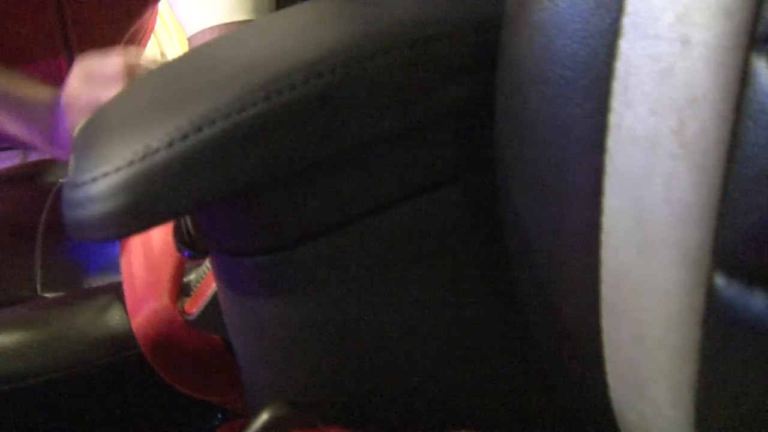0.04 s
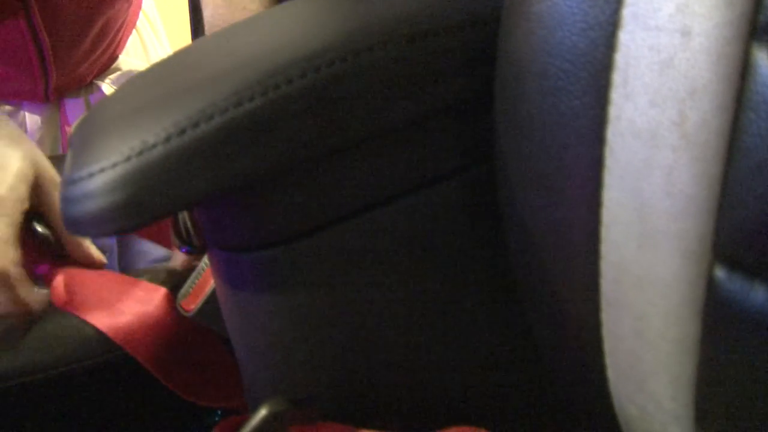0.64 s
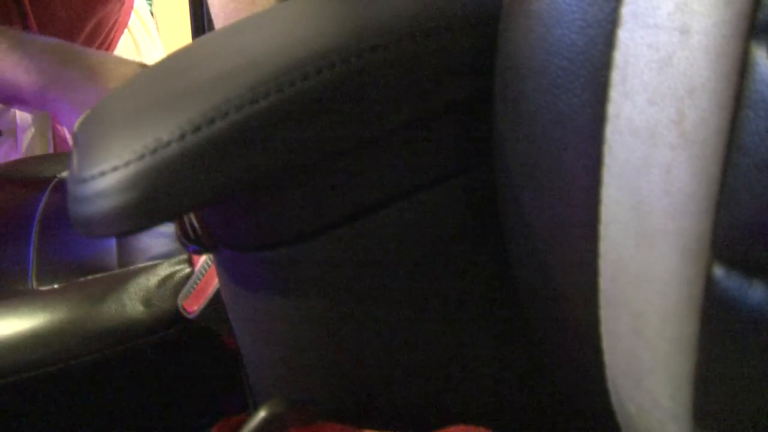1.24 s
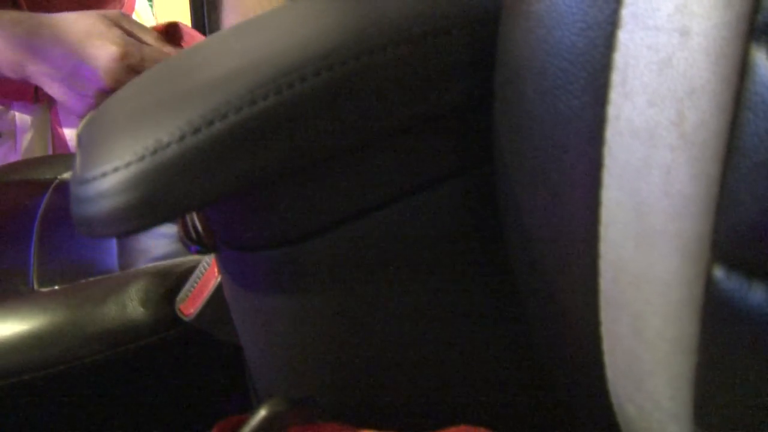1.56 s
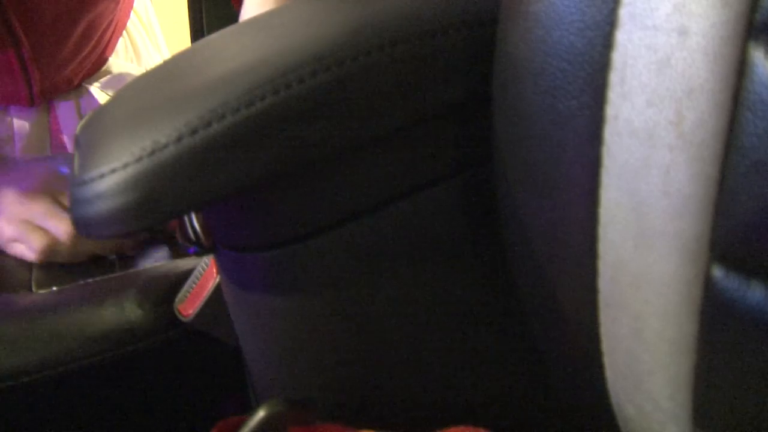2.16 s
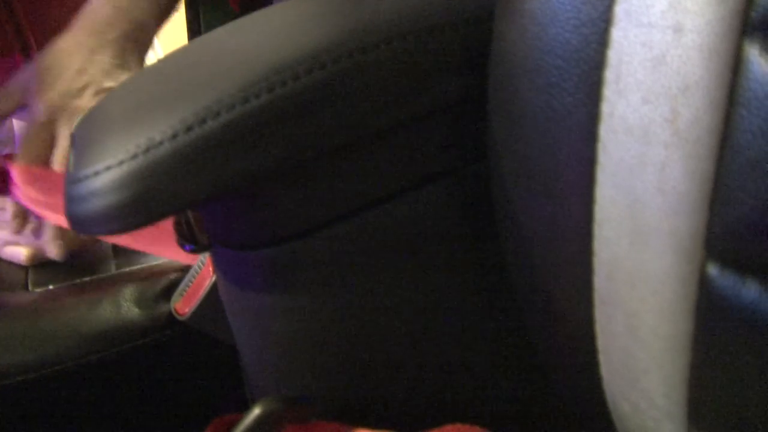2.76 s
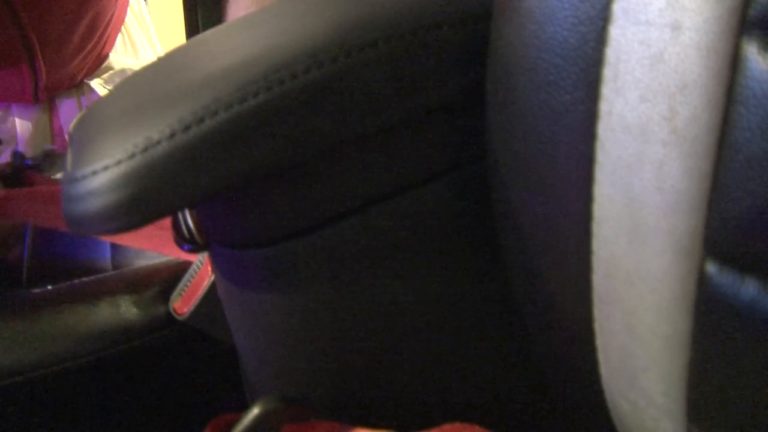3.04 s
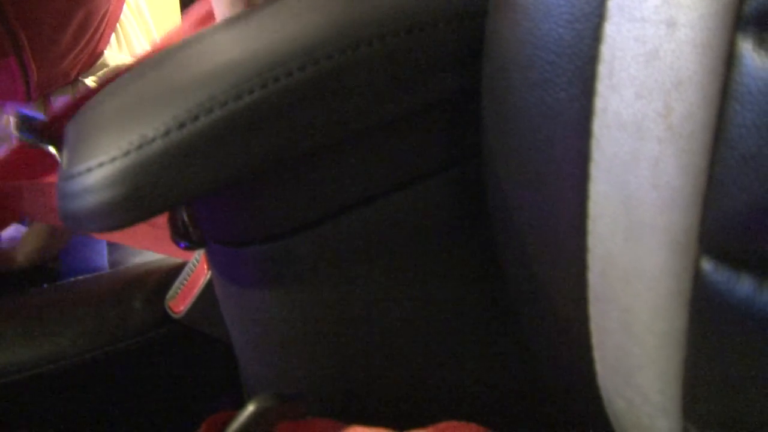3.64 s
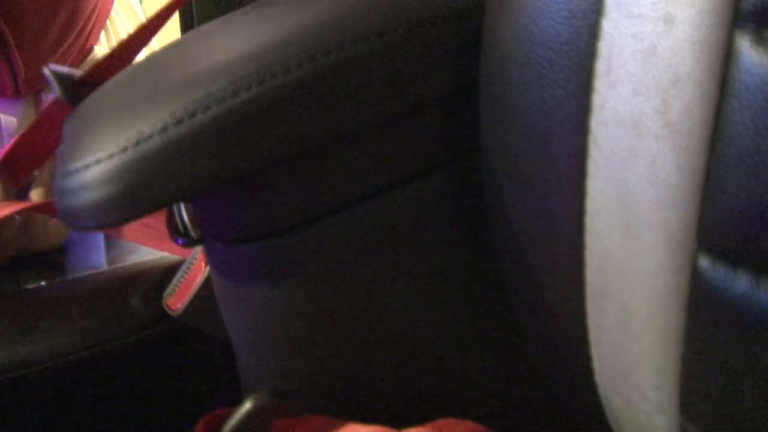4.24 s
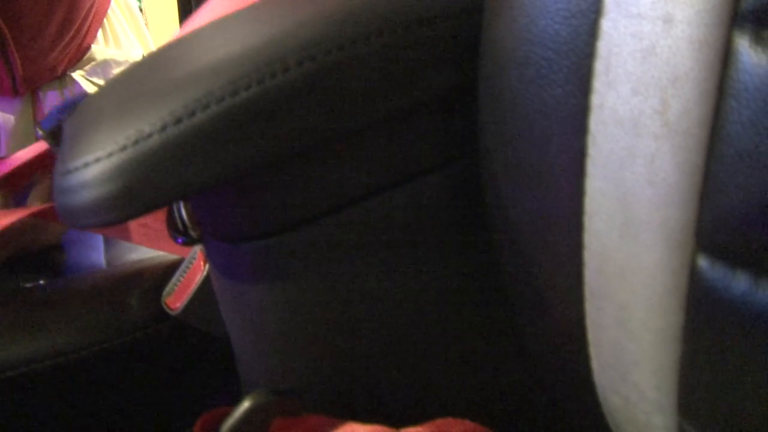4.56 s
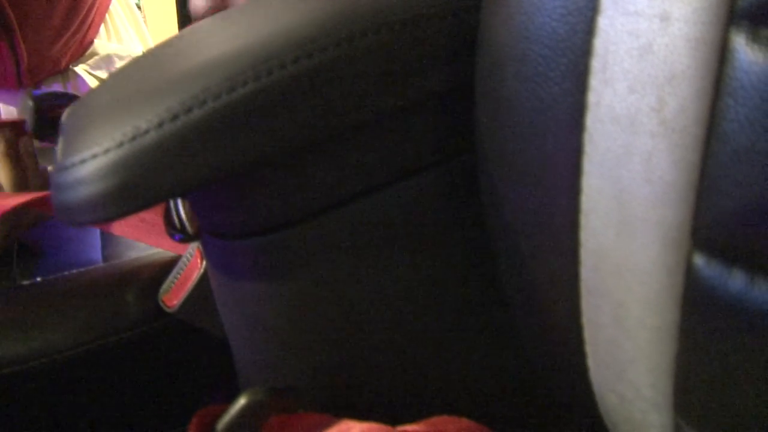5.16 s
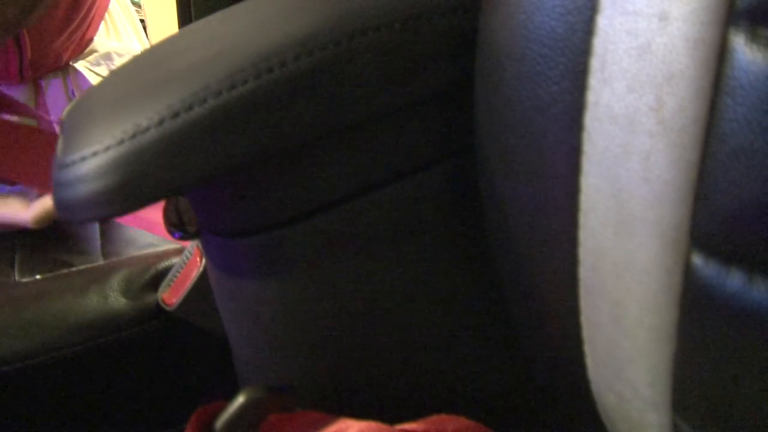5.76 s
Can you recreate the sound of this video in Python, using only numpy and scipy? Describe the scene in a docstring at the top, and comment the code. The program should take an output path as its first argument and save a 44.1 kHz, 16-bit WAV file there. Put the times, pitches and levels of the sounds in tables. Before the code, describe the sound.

A seat belt is handled close by inside a parked car, over a very faint low cabin hush. In the first half second a quick stutter of dull bumps makes the padded seat boom, with softer bumps until about 1.3 seconds. Throughout, the webbing slides over cloth and upholstery in short, uneven pulls, giving a soft rub, a hiss and a little low rumble. The metal latch and plastic buckle click and knock irregularly against hollow trim, with small scrapes and a few faint clinks. A sharp click stands out near 1.1 seconds, and plastic creaks briefly at 2 seconds. At about 3.3 seconds the latch goes home with a clack and the catch snaps shut. A knock follows at 3.7, then more strap sliding with faint zipping, a cluster of clicks near 4.8 and a scrape and click around 5.4, before the rustling fades by 6 seconds.

```python
"""Between the front seats of a parked car, a seat belt is handled.
A stutter of dull bumps sets the seat booming, then the webbing slides over cloth and upholstery in
uneven pulls, its fibres catching in a rub and a hiss. The latch tongue and buckle tick, scrape, creak
and clink against the hollow trim; midway the latch goes home with a clack and the catch springs shut."""
import sys
import numpy as np
from scipy import signal
from scipy.fft import rfft, irfft
from scipy.io import wavfile
from scipy.ndimage import uniform_filter1d

SR = 44100
rng = np.random.default_rng(int(sys.argv[2]) if len(sys.argv) > 2 else 0)


def generate_wav(sig):
    """Save sig (samples, or channels by samples) to the path in sys.argv[1] as 16-bit PCM at SR."""
    pcm = np.round(np.clip(np.atleast_2d(sig).T, -1, 1) * 32767).astype(np.int16)
    wavfile.write(sys.argv[1], SR, pcm)


N = 264864
TIME = np.arange(N) / SR

# modes of the hollow console trim: pitch_hz, level_db, t60_s
TRIM_MODES = [(106.5, -5, 0.11), (147, 1.5, 0.039), (203.6, -3.5, 0.084), (236, -8.5, 0.067),
              (294, -2, 0.042), (387, -10, 0.067), (467, -5.5, 0.031)]
# modes of the plastic buckle housing: pitch_hz, level_db, t60_s
HOUSING_MODES = [(444.4, -25, 0.0082), (790, -8.5, 0.0074), (972, -10.5, 0.014), (1530, -5, 0.0048),
                 (1760, -7, 0.005), (3060, -12, 0.0019), (3700, -38, 0.012)]
# colour of bright sliding friction: frequency_hz, level_db
HISS_SPECTRUM = [(1300, -16.5), (2100, -2), (2700, 3.5), (3400, 0.5), (4400, 0.5), (6200, -3.5),
                 (7200, -12), (9000, -5.5), (11500, -14), (13300, -18.5), (14300, -20.5), (15000, -46)]
# pulls of the strap: start_s, length_s, hiss_db, swell_db, then over the hiss: rub_db, rumble_db, sheen_db
STRAP_PULLS = [(0.207, .215, -67, -2.5, 3, 9.5, -3), (0.476, 0.016, -66.5, -8.5, 8.5, 17.5, 2),
               (0.568, 0.036, -64.5, -18, -1.5, 18.5, 0), (0.621, 0.028, -58, 0.5, 2.5, 17.5, -8),
               (0.67, 0.135, -72, 11, 0, 6.5, -3), (0.803, .15, -61.5, -5.5, 0.5, 6, -2.5),
               (0.962, 0.17, -77.5, -5, 8, 22.5, -4), (1.086, 0.18, -61, -2.5, 1, 10.5, -5),
               (1.258, 0.062, -59.5, -5.5, 0.5, 13.5, -2), (1.396, 0.031, -59.5, -4.5, 1.5, 12.5, -12),
               (1.434, 0.11, -63, 2.5, -3, 7.5, -6.5), (1.689, 0.076, -70, -6.5, 5, -10, 3.5),
               (1.805, 0.059, -62.5, 18.5, -3.5, -1.5, -3), (2.079, 0.091, -64.5, -14, 4.5, 14, -4),
               (2.211, 0.075, -79, 6, 15, 20, 2), (2.295, 0.23, -65, 4.5, 0.5, 6, 0.5),
               (2.543, 0.15, -68, -0.5, 6, 14.5, -0.5), (2.789, 0.1, -70.5, 5, 10, 12.5, -0.5),
               (2.895, 0.12, -61.5, -9, 3, 2, -3), (3.025, 0.12, -68, -6, 7, 4.5, 1),
               (3.18, 0.24, -66.5, -6, 3, 9, -0.5), (3.297, 0.051, -64, -1, 2, 14, 5),
               (3.52, 0.11, -68, 9, 3.5, 10, -0.5), (3.627, 0.21, -60.5, -2, 3, 6.5, 2.5),
               (4.064, 0.18, -64.5, -2, 1, 7, 2), (4.362, 0.041, -67, 10, -8, -1, 1),
               (4.518, 0.14, -64, 0, 0, 9, 2.5), (4.714, 0.081, -76, -16, 11.5, 20, -1),
               (4.753, 0.051, -69.5, 2, -1, -14, 2.5), (4.813, 0.27, -66, -2.5, 1, 2.5, 0),
               (5.053, 0.24, -72, 12, -26, -21, 8), (5.302, 0.09, -62.5, 1, 1.5, 6, 3.5),
               (5.371, 0.06, -53, -0.5, 3, 1, -2.5), (5.454, .014, -54.5, -0.5, 3.5, 0.5, 1.5),
               (5.702, .15, -73.5, -2, 3.5, 1.5, 4)]


def from_db(db):
    """Decibels to gain."""
    return 10 ** (np.asarray(db) / 20)


def rms_one(x):
    """Scale to unit rms."""
    return x / np.sqrt(np.mean(x ** 2) + 1e-20)


def add(track, start_s, sound):
    """Mix a sound into a track at a time."""
    at = max(round(start_s * SR), 0)
    track[at:at + len(sound)] += sound[:max(N - at, 0)]


def cut(x, hz, kind, order=2):
    """Causal low- or high-pass."""
    return signal.sosfilt(signal.butter(order, min(hz, SR / 2 - 1), kind, fs=SR, output="sos"), x + 1e-18)


def colour(x, spectrum):
    """Give a noise a spectrum; unit rms."""
    hz, db = np.transpose(spectrum)
    bins_hz = np.maximum(np.fft.rfftfreq(len(x), 1 / SR), 1)
    curve_db = np.interp(np.log(bins_hz), np.log(hz), db, left=-80, right=-80)
    return rms_one(irfft(rfft(x) * from_db(curve_db), len(x)))


def drift(per_s):
    """A random wander, gliding from one value to the next."""
    knots = rng.standard_normal(N // 20)
    return np.interp(TIME * per_s, np.arange(len(knots)), knots)


def ring(force, modes):
    """Damped modes in parallel, neighbours swinging in opposite senses."""
    out = 0
    for k, (hz, db, t60_s) in enumerate(modes):
        decay, angle = from_db(-60 / (t60_s * SR)), 2 * np.pi * hz / SR
        mode = signal.lfilter([0, np.sin(angle)], [1, -2 * decay * np.cos(angle), decay ** 2], force + 1e-18)
        out = out - (-1) ** k * from_db(db) * mode
    return out


def contact(hardness_hz, size=2048):
    """The force pulse of one touch: the softer, the longer."""
    return cut(signal.unit_impulse(size), hardness_hz, "low")


def scatter(tail_db, t60_s, size=4096):
    """A direct pulse and the dense, quickly dying reflections of the cabin."""
    tail = rng.standard_normal(size) * from_db(-60 * np.arange(size) / SR / t60_s)
    return signal.unit_impulse(size) + from_db(tail_db) * tail / np.linalg.norm(tail)


def grains(per_s, spread_db):
    """Fibres catching and letting go at random, a few harder than the rest."""
    sizes = from_db(spread_db * np.minimum(rng.exponential(1, N), 4)) * rng.choice([-1, 1], N)
    return rms_one(sizes * (rng.random(N) < per_s / SR))


def shifting(x, patchy_db, size=1024, blur=4):
    """As the contact patch moves, narrow resonances come and go at random; unit rms."""
    frames = signal.stft(x, nperseg=size)[2]
    patches = uniform_filter1d(rng.standard_normal(frames.shape), blur, axis=0)
    patches = rms_one(uniform_filter1d(patches, blur, axis=1))
    return rms_one(signal.istft(frames * from_db(patchy_db * patches), nperseg=size)[1][:N])


def cabin_tone(level_db):
    """The low, steady hush of the still cabin."""
    # colour of the cabin air: frequency_hz, level_db
    air_spectrum = [(20, -10), (60, 13), (150, -4.5), (400, -20), (1500, -12), (6000, -43.5), (15000, -45)]
    return from_db(level_db) * colour(rng.standard_normal(N), air_spectrum)


def seat_bumps(lowest_hz, slap_db):
    """Bumps set the seat booming, each with a faint dull slap on its cover."""
    # blows on the padded seat: start_s, level_db, hardness_hz
    blows = [(0.0159, -13.5, 456), (0.0522, -9, 416), (0.086, -7, 364), (.105, -8.5, 414),
             (0.1261, -8, 436), (0.166, -5, 417), (0.4156, -5, 440), (0.6442, -23.5, 452),
             (0.8181, -21.5, 240), (0.963, -31, 350), (1.0741, -19, 210), (1.0917, -16.5, 218),
             (1.106, -23, 400), (1.1766, -26, 150), (1.327, -26.5, 250), (3.513, -33, 110),
             (3.863, -32.5, 160), (5.414, -28.5, 150)]
    # modes of the seat: pitch_hz, level_db, t60_s
    seat_modes = [(65.4, -16.5, 0.15), (174, -11, 0.036), (230, -39, 0.027), (262.7, -17.5, 0.039),
                  (430, -55, 0.0066), (605, -21.5, 0.014), (727, -26.5, 0.025), (1077, -27.5, 0.043),
                  (1383, -26, 0.032)]
    force, slap = np.zeros(N), np.zeros(N)
    for start_s, db, hardness_hz in blows:
        add(force, start_s, from_db(db) * contact(hardness_hz))
        add(slap, start_s, from_db(db) * cut(scatter(tail_db=5.5, t60_s=0.048), hardness_hz, "low"))
    boom = cut(ring(force, seat_modes), lowest_hz, "high")
    return boom + from_db(slap_db) * cut(slap, 426, "high")


def tongue_clinks():
    """The steel tongue rings briefly, damped by its plastic grip."""
    # taps on the tongue: start_s, level_db
    taps = [(0.5746, -52.5), (0.8289, -55.5), (2.823, -61.5), (3.304, -49.5)]
    # modes of the steel: pitch_hz, level_db, t60_s
    steel_modes = [(2940, -18, 0.017), (3150, -17, 0.024), (4070, -11, 0.034), (4470, -12, 0.014),
                   (5060, -3, 0.014), (5880, -11, 0.049), (6550, -7.5, 0.0033)]
    force = np.zeros(N)
    for start_s, db in taps:
        add(force, start_s, from_db(db) * scatter(tail_db=12, t60_s=0.0086))
    return ring(force, steel_modes)


def latch_scrapes(fade_s):
    """A dense run of tiny catches drives the housing while the latch drags."""
    # drags over plastic: start_s, length_s, level_db, grit_db (over the hollow tone)
    drags = [(0.62, 0.032, -64.5, -5), (1.8, 0.059, -73, 4.5), (3.285, 0.023, -51, 3.5),
             (3.783, 0.023, -75, 16), (4.82, 0.012, -69, -11), (4.958, 0.033, -54.5, -2.5),
             (5.392, .06, -63.5, 6.5)]
    pressure = np.zeros((N, 2))
    for start_s, length_s, db, grit_db in drags:
        add(pressure, start_s, from_db([db, db + grit_db]) * np.ones((round(length_s * SR), 1)))
    decay = np.exp(-1 / (fade_s * SR))
    hollow, grit = signal.lfilter([1 - decay], [1, -decay], pressure.T + 1e-18)
    catches = grains(per_s=8400, spread_db=2)
    return hollow * rms_one(ring(catches, HOUSING_MODES)) + grit * colour(catches, HISS_SPECTRUM)


def plastic_creak(start_s, slips, slips_per_s, force_db, fade_db):
    """An even run of stick-slip jerks, each a little weaker, rings the plastic and the trim behind it."""
    # modes of the creaking plastic: pitch_hz, level_db, t60_s
    plastic_modes = [(930, -18, 0.0068), (1320, -17, 0.013), (1410, -20, 0.025)]
    force = np.zeros(N)
    for k in range(slips):
        slip = cut(scatter(tail_db=-1, t60_s=0.059), 1710, "low")
        add(force, start_s + k / slips_per_s, from_db(force_db - k * fade_db) * slip)
    crack = from_db(15) * cut(force, 503, "high")
    thud = from_db(-21.5) * ring(force, TRIM_MODES)
    return ring(force, plastic_modes) + crack + thud


def stray_ticks(rubbing, per_s, over_rub_db, spread_db, bright_hz, thud_db, count=160):
    """Touches of the fittings, jostled at random moments as hard as the strap is rubbing."""
    times = np.cumsum(rng.exponential(1, count)) / per_s
    chance_db = spread_db * rng.standard_normal(count)
    levels_db = 20 * np.log10(np.interp(times, TIME, rubbing)) + over_rub_db + chance_db
    return [(s, db, bright_hz, db + thud_db) for s, db in zip(times, levels_db) if s < TIME[-1]]


def buckle_knocks(strays, crack_db, ring_db, thud_db):
    """Each hard touch cracks, rings the housing and thuds in the trim."""
    # latch and buckle knocking on the trim: start_s, level_db, bright_hz, weight_db
    knocks = [(0.212, -38, 2980, -21), (0.2223, -39, 2490, -32), (.2355, -35.5, 1800, -23),
              (0.327, -40, 3880, -24), (0.8014, -37.5, 2500, -31), (1.0747, -35, 2980, -35),
              (1.1062, -28.5, 2390, -20), (1.3226, -37.5, 7850, -35), (1.4002, -35, 7300, -22),
              (1.416, -35.5, 7000, -25), (2.0873, -35.5, 6500, -20.5), (2.1295, -37, 6000, -42),
              (2.1778, -44, 3500, -43), (2.249, -36.5, 1500, -54), (2.37, -48, 1800, -28),
              (2.8398, -40, 5000, -41), (2.8738, -34.5, 3950, -32), (3.0382, -37, 3530, -54),
              (3.1124, -35.5, 3540, -57), (3.1324, -36.5, 4500, -39), (3.2881, -48, 4000, -43),
              (3.3004, -31.5, 8050, -34), (3.5136, -33.5, 2420, -33), (3.6902, -26.5, 1500, -25),
              (3.865, -33, 7140, -19.5), (4.0714, -41, 5000, -22.5), (4.4503, -41, 5750, -50),
              (4.8195, -37, 2510, -54), (4.8245, -35, 3540, -56), (4.8385, -33, 3020, -52),
              (5.312, -41, 1800, -47), (5.4598, -29, 3500, -23), (5.4662, -40, 6000, -30)]
    force, weight = np.zeros(N), np.zeros(N)
    for start_s, db, bright_hz, weight_db in knocks + strays:
        # a softer touch loses its treble, gently at first and then steeply
        touch = cut(scatter(tail_db=-8, t60_s=0.03), bright_hz, "low", order=1)
        add(force, start_s, from_db(db) * cut(touch, 1.5 * bright_hz, "low"))
        add(weight, start_s, from_db(weight_db) * contact(hardness_hz=690))
    crack = from_db(crack_db) * cut(cut(force, 513, "high", order=1), 11200, "low")
    thud = from_db(thud_db) * ring(weight, TRIM_MODES)
    return crack + from_db(ring_db) * ring(force, HOUSING_MODES) + thud


def pull_envelope(levels_db, creep_db, attack_s=0.013, release_s=0.014, stop_db=-6.5, stop_fade_s=0.0046):
    """Each pull takes hold, swells or eases, and dies away into the creeping of the slack strap."""
    # the strap stops and its creeping dips: start_s, length_s
    stops = [(.515, 0.034), (1.005, 0.068), (1.33, 0.057), (2.075, 0.0087), (4.425, 0.028), (4.675, 0.059)]
    stopped = np.zeros(N)
    for start_s, length_s in stops:
        add(stopped, start_s, np.ones(round(length_s * SR)))
    power = from_db(creep_db + stop_db * uniform_filter1d(stopped, round(stop_fade_s * SR))) ** 2
    t = TIME[:SR // 2]
    attack = np.minimum(t / attack_s, 1)
    for (start_s, length_s, _, swell_db, *_), db in zip(STRAP_PULLS, levels_db):
        hold = from_db(db + swell_db * (np.minimum(t / length_s, 1) - 0.5))
        release = np.exp(-np.maximum(t - length_s, 0) / release_s)
        add(power, start_s, (attack * hold * release) ** 2)
    return np.sqrt(power)


def strap_zips(width_share):
    """Uneven slips give a narrow band of noise that glides with the speed of the pull."""
    # weave zipping over an edge (high), upholstery groaning (low):
    # start_s, length_s, first_hz, last_hz, level_db
    slides = [(0.636, 0.029, 419, 389, -54), (0.954, 0.1, 344, 313, -57.5), (1.119, 0.0744, 385, 356, -48),
              (1.19, 0.085, 481, 453, -68), (1.826, 0.05, 3380, 3100, -64), (2.462, 0.079, 3880, 4350, -66),
              (2.55, 0.24, 132.3, 109, -55), (2.85, 0.06, 223, 193, -54.5), (3.062, 0.07, 136, 146, -51),
              (4.044, 0.095, 3870, 4600, -61), (4.845, 0.11, 2940, 2750, -66),
              (4.955, 0.045, 1030, 693, -53), (5.105, 0.35, 3990, 5230, -68), (5.46, 0.1, 154, 106, -55.5)]
    out = np.zeros(N)
    for start_s, length_s, first_hz, last_hz, db in slides:
        n = round(length_s * SR)
        noises = rng.standard_normal((2, SR))
        even, odd = [rms_one(cut(noise, width_share * first_hz, "low")[-n:]) for noise in noises]
        phase = 2 * np.pi * np.cumsum(np.linspace(first_hz, last_hz, n)) / SR
        band = even * np.cos(phase) + odd * np.sin(phase)
        add(out, start_s, from_db(db) * np.hanning(n) * band)
    return out


def webbing(rubbing, rumble_db, heave_db, rub_db, judder_db, sheen_hz):
    """The strap slides in small jerks: trim and cushion rumble, the cloth rubs, the weave hisses."""
    # slow heaving of the seat cushion: frequency_hz, level_db
    heave_spectrum = [(30, -31), (55, -14), (75, 12), (110, -3), (200, -75)]
    # webbing rubbing on cloth: frequency_hz, level_db
    cloth_spectrum = [(230, -42), (330, -4), (440, -5), (620, -2.5), (780, -2.5), (1000, -0.5), (1180, -4),
                      (1370, -3.5), (1600, -6.5), (2000, -9), (2800, -18.5)]
    _, _, hiss_db, _, _, load_db, sheen_db = np.transpose(STRAP_PULLS)
    rumble = pull_envelope(hiss_db + load_db, creep_db=-70.5, release_s=0.032)  # the seat settles later
    hiss = pull_envelope(hiss_db, creep_db=-73)
    sheen = pull_envelope(hiss_db + sheen_db, creep_db=-73.5)
    judder = from_db(judder_db * drift(per_s=110))
    trim = rms_one(ring(grains(per_s=380, spread_db=6.5), TRIM_MODES))
    cushion = from_db(heave_db) * colour(rng.standard_normal(N), heave_spectrum)
    cloth = colour(grains(per_s=1800, spread_db=0.5), cloth_spectrum)
    # close windows and panels reflect the rubbing and comb its spectrum
    cloth = signal.fftconvolve(cloth, scatter(tail_db=-4, t60_s=0.035))[:N]
    cloth = shifting(cloth, patchy_db=3)
    weave = shifting(colour(grains(per_s=9000, spread_db=2), HISS_SPECTRUM), patchy_db=2)
    top = signal.sosfiltfilt(signal.butter(2, sheen_hz, "high", fs=SR, output="sos"), weave)
    friction = from_db(rub_db) * rubbing * cloth + hiss * (weave - top) + sheen * top
    return from_db(rumble_db) * rumble * (trim + cushion) + judder * friction


def latch_clacks():
    """Heavy blows ring the hollow buckle; on the last one the catch springs shut."""
    # the latch bumps the buckle, then is driven home: start_s, level_db, hardness_hz
    blows = [(.584, -30, 453), (.647, -30.5, 636), (3.2992, -23, 2200)]
    # modes of the buckle's hollow: pitch_hz, level_db, t60_s
    hollow_modes = [(317, -6.5, 0.028), (420, -11, 0.022), (873, -11.5, 0.022)]
    # thin ring of the catch: pitch_hz, level_db, t60_s
    catch_modes = [(9400, -21, 0.022)]
    force, snap = np.zeros(N), np.zeros(N)
    for start_s, db, hardness_hz in blows:
        add(force, start_s, from_db(db) * contact(hardness_hz))
    home_s, home_db, _ = blows[-1]
    add(snap, home_s, from_db([home_db]))
    return ring(force, hollow_modes) + ring(snap, catch_modes)


def scene():
    """Seat, belt and fittings in the quiet cabin, in mono."""
    _, _, hiss_db, _, rub_db, _, _ = np.transpose(STRAP_PULLS)
    rubbing = pull_envelope(hiss_db + rub_db, creep_db=-73.5)
    strap = webbing(rubbing, rumble_db=-2.5, heave_db=-10, rub_db=-2, judder_db=2, sheen_hz=6500)
    strap += strap_zips(width_share=0.16)
    cabin = cabin_tone(level_db=-73)
    bumps = seat_bumps(lowest_hz=47.6, slap_db=-1)
    fittings = tongue_clinks() + latch_scrapes(fade_s=0.0019) + latch_clacks()
    creak = plastic_creak(start_s=2.0159, slips=6, slips_per_s=156, force_db=-37, fade_db=0.4)
    strays = stray_ticks(rubbing, per_s=12, over_rub_db=14, spread_db=1.5, bright_hz=2800, thud_db=-16.5)
    knocks = buckle_knocks(strays, crack_db=8.5, ring_db=1, thud_db=-24)
    return (cabin + bumps + fittings + creak + knocks + strap)[None]


def record(dry):
    """The microphone port ripples the treble; the top is cut at 15 kHz."""
    # peaks and dips of the port: centre_hz, width_hz, gain_db
    port_resonances = [(7800, 190, 6.5), (8850, 2540, -10), (9430, 300, 5), (10420, 430, -7),
                       (11330, 1700, 7.5)]
    for hz, width_hz, db in port_resonances:
        band = signal.lfilter(*signal.iirpeak(hz, hz / width_hz, fs=SR), dry)
        dry = dry + (from_db(db) - 1) * band
    return signal.sosfilt(signal.ellip(10, 0.1, 80, 15000, fs=SR, output="sos"), dry)


dry = scene()
out = record(dry)
generate_wav(out)
```